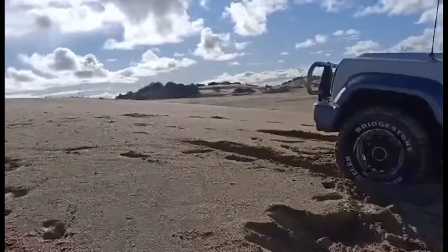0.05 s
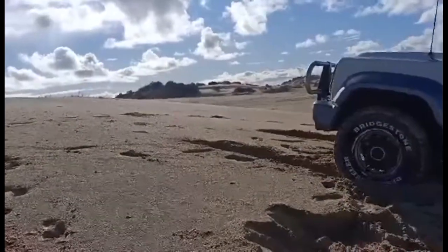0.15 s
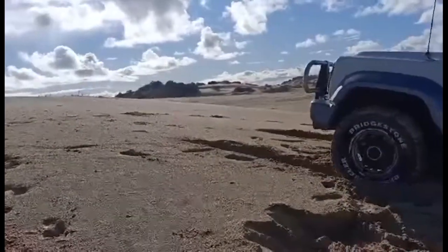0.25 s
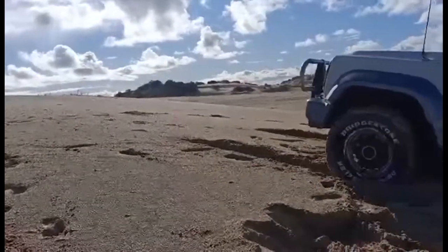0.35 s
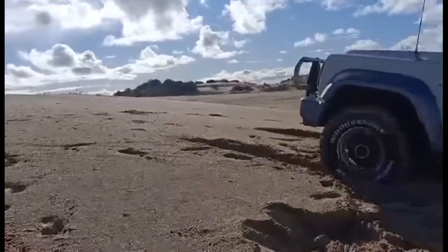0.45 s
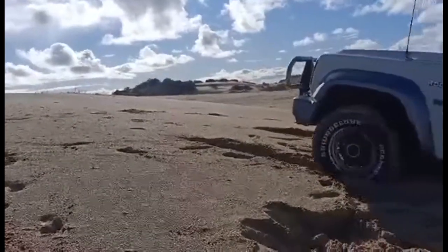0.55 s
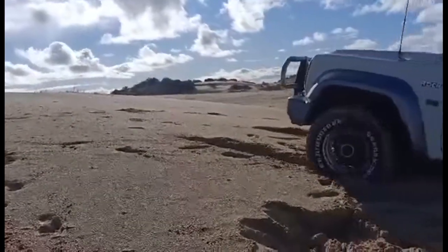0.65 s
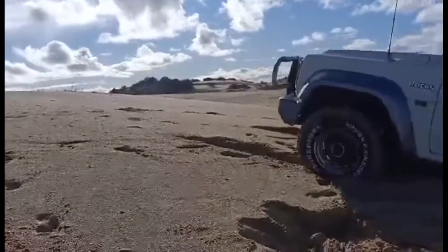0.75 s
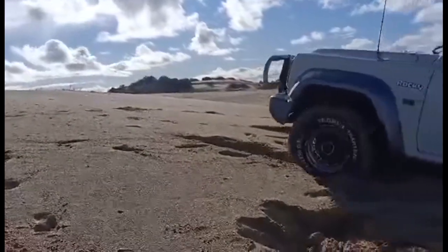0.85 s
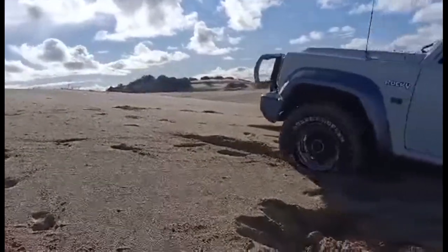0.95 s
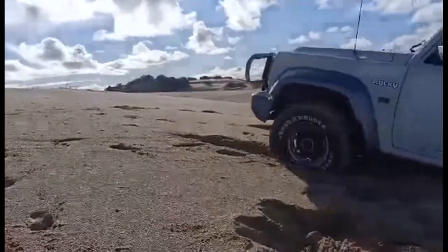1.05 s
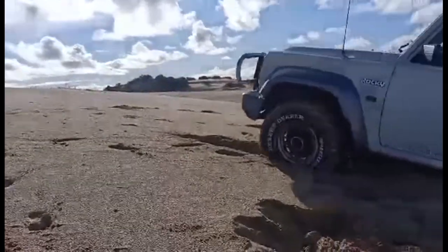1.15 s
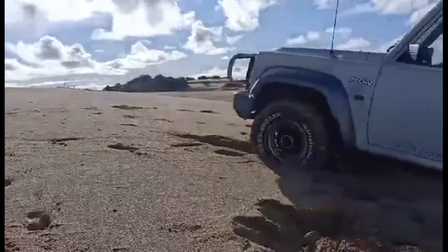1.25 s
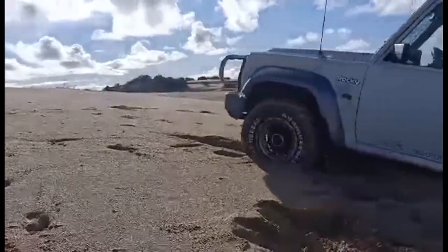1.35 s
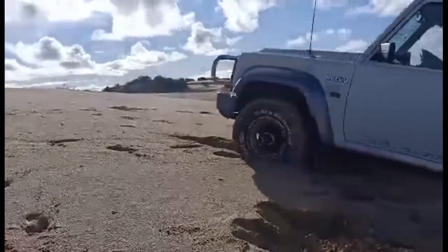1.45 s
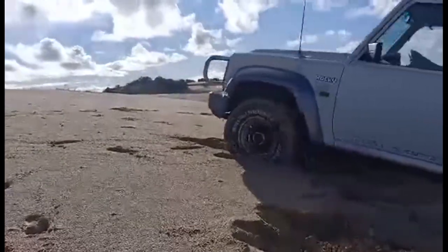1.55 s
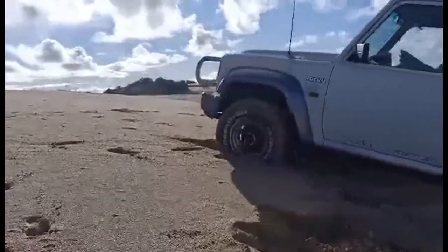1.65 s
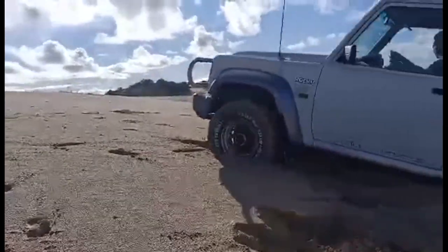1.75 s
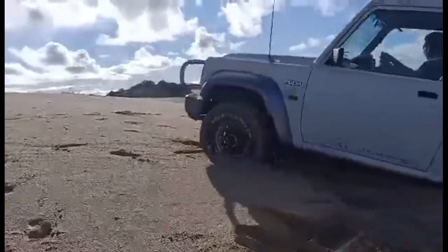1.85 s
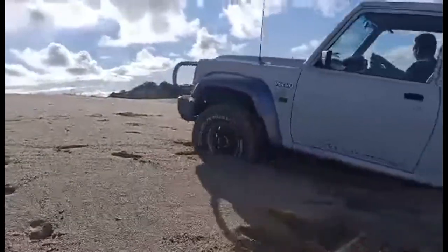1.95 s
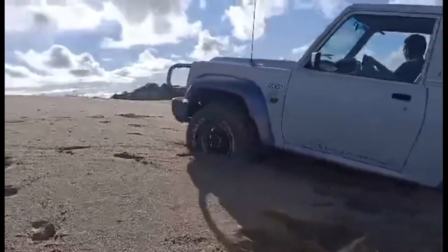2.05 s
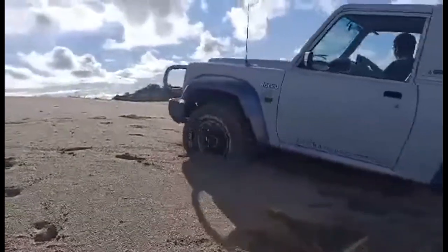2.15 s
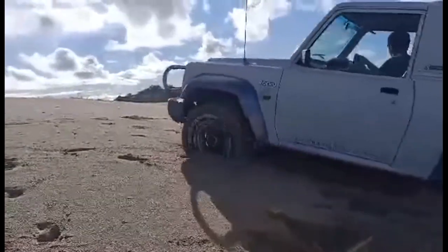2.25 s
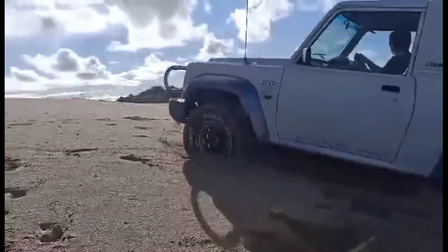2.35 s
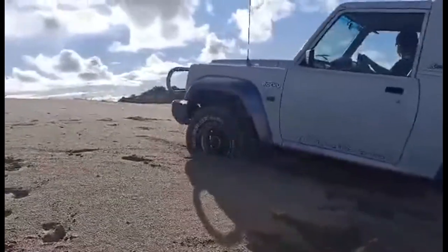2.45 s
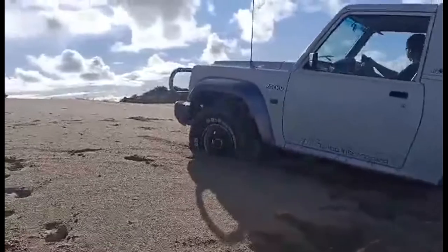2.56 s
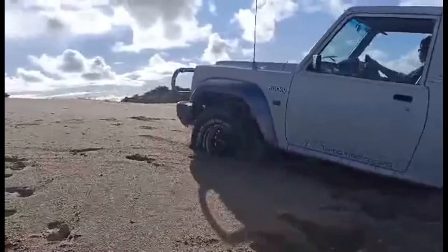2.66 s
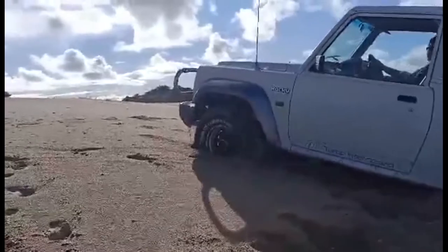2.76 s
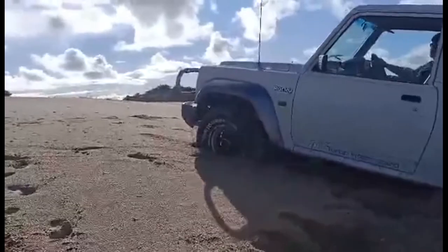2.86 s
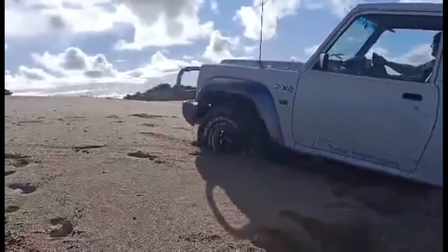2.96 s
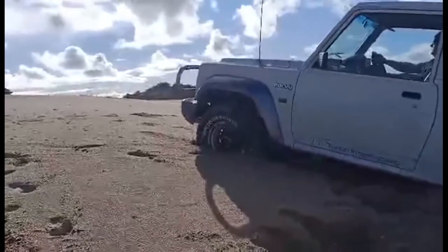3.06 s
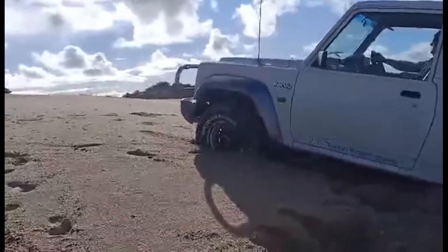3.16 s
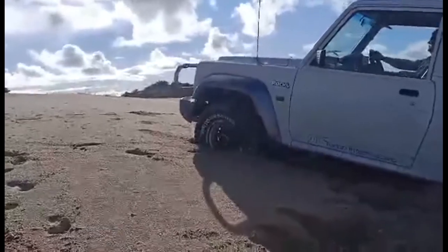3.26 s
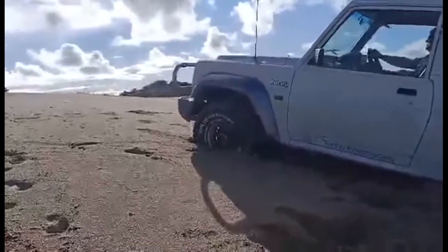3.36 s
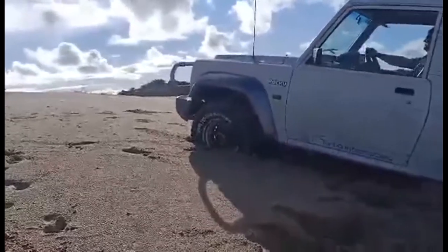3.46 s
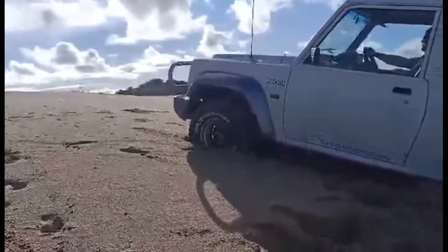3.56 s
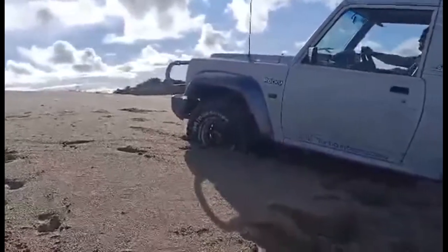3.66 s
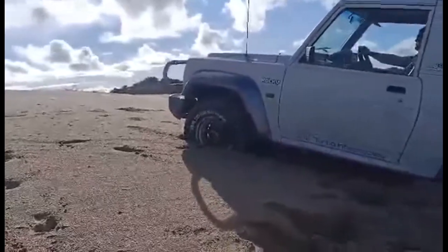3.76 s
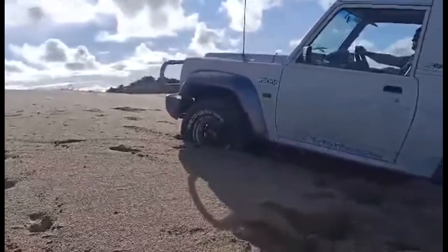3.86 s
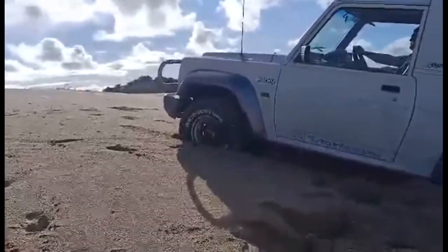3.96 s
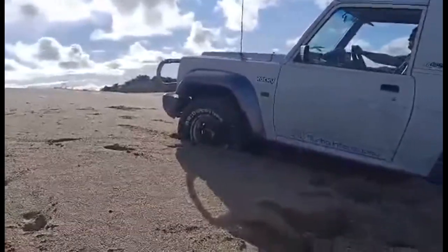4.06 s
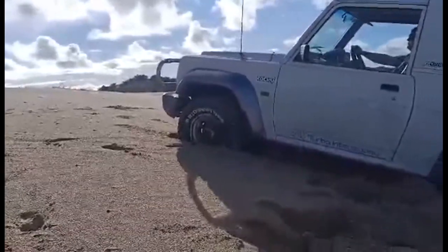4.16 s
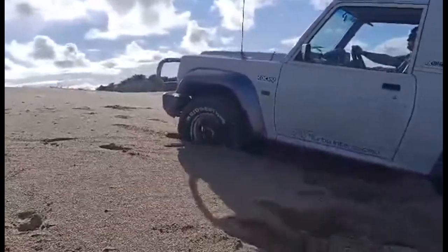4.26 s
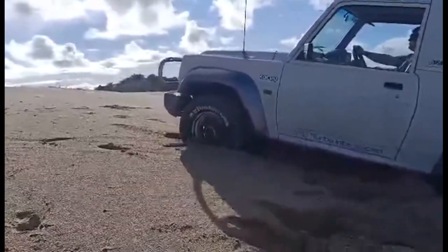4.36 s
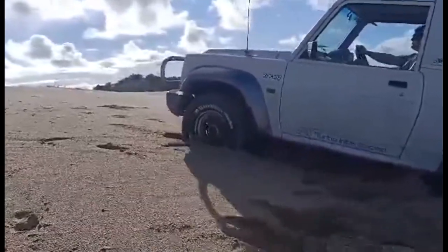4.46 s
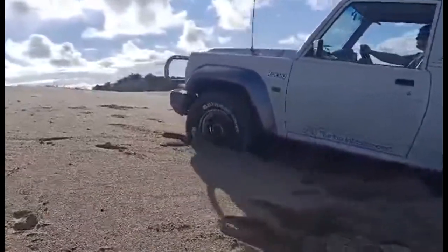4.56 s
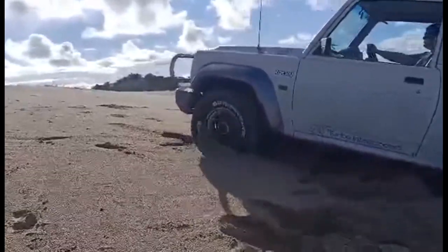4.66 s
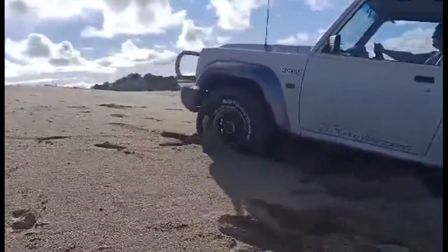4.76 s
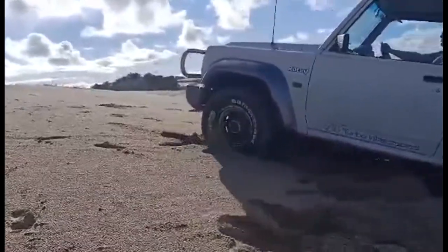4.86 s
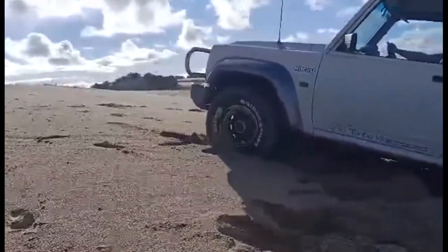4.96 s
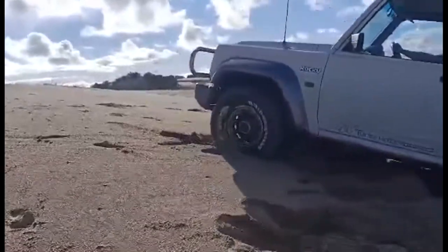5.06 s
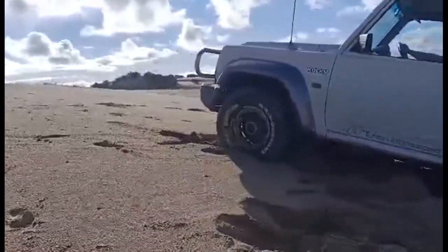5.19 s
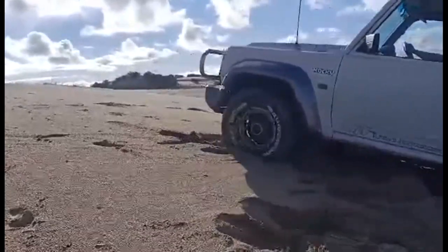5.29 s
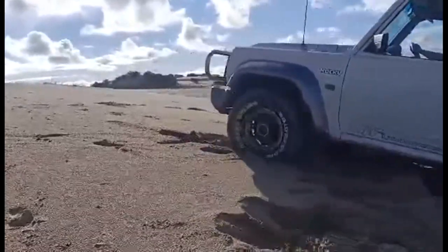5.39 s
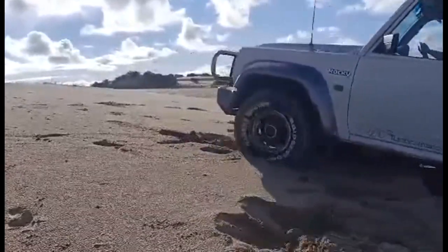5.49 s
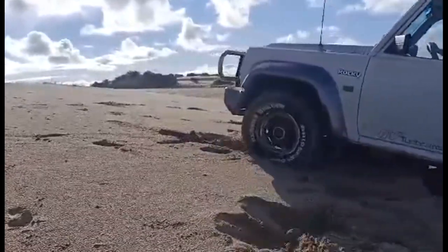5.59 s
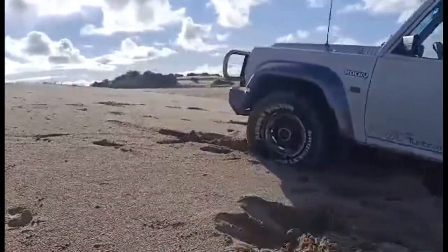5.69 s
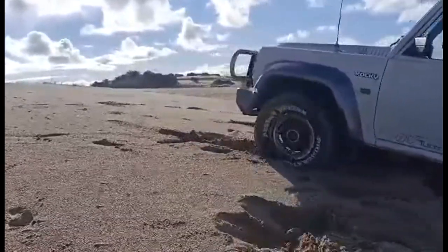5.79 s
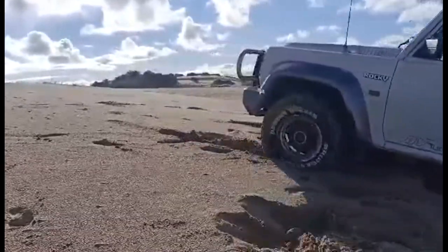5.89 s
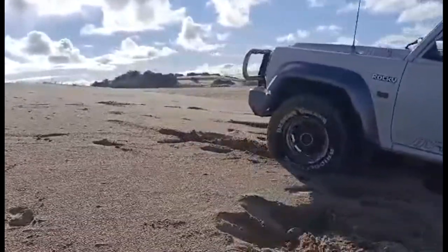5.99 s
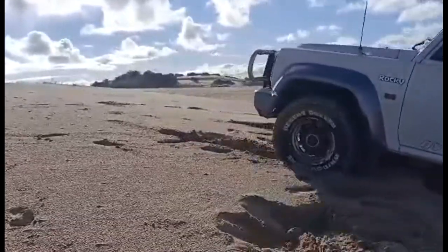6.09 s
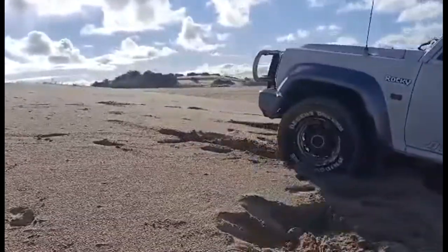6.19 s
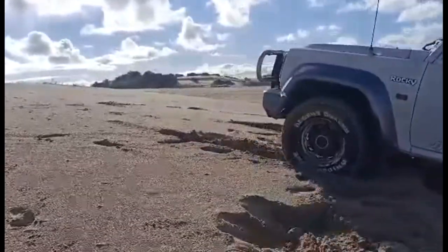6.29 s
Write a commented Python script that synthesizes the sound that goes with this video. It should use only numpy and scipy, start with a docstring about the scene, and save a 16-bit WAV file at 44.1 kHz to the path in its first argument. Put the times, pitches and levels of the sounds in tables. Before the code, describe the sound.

A four-wheel drive's turbo diesel engine labours through soft beach sand, close to the microphone. It revs up with a deep boom, hard knocking and a thin turbo hiss and whistle, while the tyres churn with a dull rumble. The throttle shuts, the body thumps and the revs fall. The engine pulls again gently, then settles to a slow clatter.

```python
"""A four-cylinder turbo diesel engine drives a four-wheel drive through soft beach sand, close by.
It revs up under load with a deep boom and hard knock, the throttle shuts and the body thumps,
then it pulls again gently and drops to a slow clatter. Each firing of a cylinder sends gas down the
exhaust pipe and makes the engine's metal ring. Wheels churn the sand underneath, and the turbo
hisses and whistles, following the gas flow a little late."""
import sys
import numpy as np
from scipy import signal
from scipy.fft import rfft, irfft
from scipy.io import wavfile
from scipy.ndimage import uniform_filter1d

SR = 44100
rng = np.random.default_rng(int(sys.argv[2]) if len(sys.argv) > 2 else 0)


def bounce(signal):
    """Save signal as a 16-bit WAV file at the path given by the first command-line argument."""
    frames = np.transpose(np.atleast_2d(signal))
    limited = np.clip(frames, -1, 1)
    pcm = np.round(limited * 32767).astype(np.int16)
    wavfile.write(sys.argv[1], SR, pcm)


N = 279153
TIME = np.arange(N) / SR


def from_db(db):
    """Turn decibels into a number to multiply by."""
    return 10 ** (np.asarray(db) / 20)


def rms_one(x):
    """Scale a sound to an average power of 1."""
    return x / np.sqrt(np.mean(x ** 2) + 1e-20)


def curve(rows):
    """Join (seconds, value) points with straight lines."""
    return np.interp(TIME, *np.transpose(rows))


def levelled(x, size=8000):
    """Hold the power near 1 over every few firings; the pulses keep their shape."""
    power = uniform_filter1d(uniform_filter1d(x ** 2, size), size // 2)
    return x / np.sqrt(np.maximum(power, 1e-20))


def drift(hz):
    """A smooth random wobble of about 1 either way; more hz makes it quicker."""
    step, warm_up = 40, 2000
    r = np.exp(-2 * np.pi * step * hz / SR)
    slow = signal.lfilter([1], [1, -2 * r, r * r], rng.standard_normal(N // step + warm_up + 2))
    slow = rms_one(slow[warm_up:])
    return np.interp(np.arange(N) / step, np.arange(len(slow)), slow)


def coloured(x, spectrum, size=4096):
    """Give a sound the tone colour drawn by (Hz, dB) points, at a power of 1."""
    hz, db = np.transpose(spectrum)
    octave = np.log2(np.maximum(np.fft.rfftfreq(size, 1 / SR), 1))
    outside = np.abs(octave - np.clip(octave, np.log2(hz[0]), np.log2(hz[-1])))
    gain = from_db(np.interp(octave, np.log2(hz), db) - 30 * np.minimum(outside, 2))
    # build a filter that rings only after a hit, never before
    cepstrum = irfft(np.log(gain))[:size // 2]
    response = irfft(np.exp(rfft(np.r_[cepstrum[0], 2 * cepstrum[1:]], size)))
    return rms_one(signal.oaconvolve(x, response)[:N])


def resonate(x, hz, width_hz):
    """Ring at one pitch; a smaller width rings longer."""
    r = np.exp(-np.pi * width_hz / SR)
    feedback = [1, -2 * r * np.cos(2 * np.pi * hz / SR), r * r]
    return signal.lfilter(np.array([1, 0, -1]) * (1 - r * r) / 2, feedback, x + 1e-18)


MID_REVS = 40   # firings per second
THROTTLE_BEND = 1.65   # the first part of the pedal's travel adds little loudness

def loudness(rate, throttle, db, doubling_db, throttle_db):
    """Start from db at mid revs, throttle shut; grow with each doubling of revs and with throttle."""
    return from_db(db + doubling_db * np.log2(rate / MID_REVS) + throttle_db * throttle ** THROTTLE_BEND)


# Engine speed. Each row: time in seconds, firings per second.
SPEED = [(0.0, 25.66), (0.28, 36.84), (0.47, 37.86), (0.61, 33.38), (0.91, 35.47), (1.42, 44.94),
         (1.56, 44.86), (1.9, 56.77), (2.14, 62.95), (2.36, 62.69), (2.59, 73.81), (2.74, 59.01),
         (2.84, 54.03), (3.64, 26.73), (3.99, 30.44), (4.2, 27.49), (4.66, 28.22), (5.17, 22.13),
         (6.33, 20.82)]
# The driver's foot. Each row: time in seconds, throttle from 0 (shut) to 1 (wide open).
THROTTLE = [(0.08, 0.12), (.28, 0.57), (.52, 0.52), (.7, 0.83), (1.0, 0.79), (1.2, 0.86), (1.6, 0.86),
            (2.28, 0.7), (2.55, 0.87), (2.62, 0.4), (3.1, 0.23), (3.35, 0.11), (3.65, 0.11), (3.9, 0.25),
            (4.35, 0.31), (4.67, 0.45), (4.95, 0.1), (6.33, .01)]

def driving():
    """The engine's speed, its running count of firings and the throttle."""
    rate = curve(SPEED)
    return rate, np.cumsum(rate) / SR, curve(THROTTLE)


def kicked(firings, modes, lead, uneven_db, gas_noise, soft_hz, puff=0.67):
    """Each firing, moved early by lead firings, sets tones ringing with a soft kick and a gas puff."""
    count = np.floor(firings + lead).astype(int)
    starts = np.flatnonzero(np.diff(count)) + 1
    gas = gas_noise * rms_one(rng.standard_normal(N) * np.exp(-((firings + lead) % 1) / puff))
    chance = rng.standard_normal((300, len(modes)))[:len(starts)]
    out = 0
    for k, (hz, width_hz, db, *cylinder_db) in enumerate(modes):
        kick_db = np.array(cylinder_db)[count[starts] % len(cylinder_db)]
        kicks = np.zeros(N)
        kicks[starts] = from_db(kick_db + uneven_db * chance[:, k])
        out = out + (-1) ** k * from_db(db) * resonate(rms_one(kicks) + gas, hz, width_hz)
    band = signal.butter(2, [modes[0][0] * .7, soft_hz], "band", fs=SR, output="sos")
    return levelled(signal.sosfilt(band, out))


# Shudder tones. Each row: pitch in Hz, width in Hz, level in dB, extra dB for each of four cylinders.
SHUDDER_TONES = [(102.2, 27, 1.5, -0.72, -0.096, -0.85, 0.82), (142.8, 9.8, 2.5, 0.12, -1.3, 0.099, 3.4),
                 (180.3, 30, -2, -1.3, -1.6, 0.33, 5.8)]
# How loud the shudder is. Each row: time in seconds, level in dB.
SHUDDER_DB = [(0, -35.5), (.5, -37), (1.2, -34), (2.4, -46), (3.3, -37.5), (4.1, -51), (4.95, -37),
              (5.35, -32.5), (5.7, -38.5)]

def shudder(firings):
    """The firings shake the engine on its mounts."""
    shake = kicked(firings, SHUDDER_TONES, lead=0.2506, uneven_db=3.0, gas_noise=0.21, soft_hz=210)
    return from_db(curve(SHUDDER_DB)) * shake


# Body tones. Each row: pitch in Hz, width in Hz, level in dB, extra dB for each of four cylinders.
DRONE_TONES = [(207.5, 47, -2, 1.9, 0.8, -1.5, -4), (235, 50.7, -1.5, 2.9, 4.05, -2.5, -3)]

def drone(firings, rate, throttle, peak_rate=60.4, half_width=14.9, peak_db=18.86):
    """The body drones most as the revs pass the speed that suits its panels."""
    swell_db = peak_db / (1 + ((rate - peak_rate) / half_width) ** 2)
    panels = kicked(firings, DRONE_TONES, lead=0.3684, uneven_db=1.0, gas_noise=0.17, soft_hz=367)
    return from_db(-49.5 + swell_db + 17 * throttle ** THROTTLE_BEND) * panels


# Growl tones. Each row: pitch in Hz, width in Hz, level in dB, extra dB for each of four cylinders.
GROWL_TONES = [(301.6, 28, 3.5, 1.3, -5.5, 1.3, 0), (331.5, 39, 0, 2.5, -13, 0.79, 0),
               (419, 39, -10, 0.4, -20, -0.77, 0)]
# How loud the growl is. Each row: time in seconds, level in dB.
GROWL_DB = [(0, -41.5), (1.6, -38.5), (2.2, -25), (2.55, -30), (2.75, -34.5), (3.6, -50), (4.1, -41),
            (4.65, -37.5), (5.0, -66), (6.33, -59)]

def growl(firings):
    """Rough puffs of gas make the pipe growl around 330 Hz."""
    pipe = kicked(firings, GROWL_TONES, lead=.33, uneven_db=3.5, gas_noise=0.96, soft_hz=488)
    return from_db(curve(GROWL_DB)) * pipe


# What the pipe lets through. Each row: pitch in Hz, level in dB.
PIPE = [(21, -52), (30, -54), (45, -35), (56, -21), (71, -18.5), (84, -8), (106, -11.5), (128, -13),
        (150, -28), (175, -22.5), (205, -49), (230, -21), (255, -20), (290, -15)]
# The gas pulses. Each entry: strength in dB at 1, 2, 3 and 4 times the firing rate.
HARMONIC_DB = [2, -9.5, -14.5, -12]

def boom(firings, rate, throttle, lead=0.268, travel_s=0.00896, skew=0.4, idle_fuel=0.011):
    """Deep tones of the gas pulses slide through the pipe's own pitches; more fuel makes them louder."""
    arrived = firings + lead - travel_s * rate
    hz, pipe_db = np.transpose(PIPE)
    out = 0
    for k, harmonic_db in enumerate(HARMONIC_DB):
        passed_db = np.interp(np.log((k + 1) * rate), np.log(hz), pipe_db)
        db = harmonic_db + passed_db + 1.26 * drift(18.0)
        out = out + from_db(db) * np.cos(2 * np.pi * (k + 1) * arrived + skew * k * (k - 1))
    fuel = idle_fuel + (1 - idle_fuel) * throttle
    return np.sqrt(2) * fuel ** 0.83 * out


# The four cylinders. Each entry: knock strength in dB.
CYLINDER_DB = [0.33, 0.24, -0.46, 0.29]
# Single firings, most of them harder. Each row: time in seconds, extra dB (scaled by hard_share).
HARD_KNOCKS = [(.70, -1), (.845, 2.5), (.901, 8.5), (1.214, 5.5), (1.49, 7), (1.743, 5), (2.503, 0)]

def bursts(firings, rate, rise_s, uneven_db, sharpness, hard_share):
    """The loudness jumps up and dies away within each firing, each cylinder at its own strength."""
    count = np.floor(firings).astype(int)
    chance_db = uneven_db * rng.standard_normal(300)[count]
    strength_db = np.array(CYLINDER_DB)[count % len(CYLINDER_DB)] + chance_db
    for s, db in HARD_KNOCKS:
        nearest = np.round(np.interp(s, TIME, firings))
        strength_db = strength_db + hard_share * db * (count == nearest)
    peak_s = rise_s * (rate.mean() / rate) ** 0.097   # shorter at higher revs
    age = firings % 1 / rate / peak_s
    return levelled(from_db(strength_db) * (age * np.exp(-age)) ** sharpness)


# Ringing of the engine block and covers. Each row: pitch in Hz, width in Hz, level in dB.
BLOCK_TONES = [(741, 23, 1), (1152, 190, -7), (1386, 460, -3), (2081, 28, 1.5), (2723, 7.7, 5.5),
               (2900, 25, -13), (3750, 23, -10)]
BURST_SHARE, LOADED_SHARE = (0.29, 1), (0.17, 0.61)   # each pair: throttle shut, wide open

def clatter(burst, rate, throttle, loaded, light, grain_db):
    """Gritty metal hits ring in the block: bursts at the firings over steady gear and valve noise."""
    blur = 0.21 * np.log2(rate / MID_REVS)   # bursts run together at high revs
    share = np.clip(np.interp(throttle, [0, 1], BURST_SHARE) - blur, 0, .98)
    envelope = np.sqrt(share * burst ** 2 + 1 - share)
    impacts = levelled(rng.standard_normal(N) * envelope * from_db(grain_db * drift(280)))
    rung = impacts + sum(from_db(db) * resonate(impacts, hz, width) for hz, width, db in BLOCK_TONES)
    load = np.interp(throttle, [0, 1], LOADED_SHARE)
    return levelled(load * coloured(rung, loaded) + (1 - load) * coloured(rung, light))


# Knock colour, working hard and running light. Each row: pitch in Hz, relative level in dB.
KNOCK_LOADED = [(450, -17), (590, -4), (740, 2.5), (900, 2), (1300, -1), (1500, -1), (1720, -28),
                (2100, -26.5)]
KNOCK_LIGHT = [(400, 12.5), (600, 0), (760, 8.5), (1000, 6), (1400, 2.5), (1700, -5.5), (2100, -4.5)]

def knock(firings, rate, throttle):
    """Burning fuel hammers the engine block at each firing."""
    hits = bursts(firings + 0.33, rate, rise_s=0.0037, uneven_db=1.5, sharpness=0.6, hard_share=1.0)
    gain = loudness(rate, throttle, db=-52.5, doubling_db=6.3, throttle_db=20.2)
    return gain * clatter(hits, rate, throttle, KNOCK_LOADED, KNOCK_LIGHT, grain_db=2.5)


# Rattle colour, working hard and running light. Each row: pitch in Hz, relative level in dB.
RATTLE_LOADED = [(1600, -10), (2050, 1), (2600, 6), (3100, 3), (3800, 5.5), (4300, -2.5), (4900, -12.5),
                 (5900, -15.5), (6900, 0.5), (8000, -11.5), (10000, -15), (12000, -19.5), (14000, -21)]
RATTLE_LIGHT = [(1400, 1), (1650, 1), (1900, 7), (2500, -0.5), (3100, -3.5), (3750, 0.5), (4300, -10),
                (5000, -9), (6000, -5), (6900, -2.5), (8300, -3.5), (10000, -10), (14000, -11)]

def rattle(firings, rate, throttle):
    """Bright metal ticking comes just after each knock."""
    ticks = bursts(firings + 0.26, rate, rise_s=0.0055, uneven_db=2.54, sharpness=1.5, hard_share=0.22)
    gain = loudness(rate, throttle, db=-53.5, doubling_db=6.1, throttle_db=13.03)
    return gain * clatter(ticks, rate, throttle, RATTLE_LOADED, RATTLE_LIGHT, grain_db=1.0)


# Colour of churning sand. Each row: pitch in Hz, relative level in dB.
CHURN = [(25, -18.5), (45, -2), (70, -2.5), (120, -7.5), (170, 0), (260, -9.5), (400, -17), (600, -28)]

def sand(rate, throttle, lumps_db=1.35):
    """The tyres dig in with a dull, lumpy rumble."""
    gain = loudness(rate, throttle, db=-32.5, doubling_db=6, throttle_db=2.84)
    return gain * from_db(lumps_db * drift(4.9)) * coloured(rng.standard_normal(N), CHURN)


# Drive line and suspension blows. Each row: start in seconds, level in dB, share of rattle (0 to 1).
THUMPS = [(0.337, -22.5, 0.22), (2.808, -15, 0.08), (4.901, -24.5, 0.27)]
# Ringing of the car's frame. Each row: pitch in Hz, width in Hz, level in dB.
FRAME_TONES = [(211, 24, -20), (279, 44, 5.5), (320, 14, -14), (547, 120, -33), (690, 160, -37)]

def thumps(rattle_s=0.056, soft_hz=900):
    """A cushioned blow rings the frame and briefly shakes loose parts."""
    out = np.zeros(N)
    for start, db, share in THUMPS:
        age = np.maximum(TIME - start, 0)
        ring = sum(from_db(tone_db) * np.exp(-np.pi * width_hz * age) * np.sin(2 * np.pi * hz * age)
                   for hz, width_hz, tone_db in FRAME_TONES)
        noise = coloured(rng.standard_normal(N), [(300, 27), (750, 13), (1200, 4), (4000, -10)])
        shake = noise * np.exp(-age / rattle_s) * (age > 0)
        out += from_db(db) * ((1 - share) * ring + share * shake)
    cushioned = signal.sosfilt(signal.butter(1, soft_hz, fs=SR, output="sos"), out)
    return signal.sosfilt(signal.butter(2, 160, "high", fs=SR, output="sos"), cushioned)


def turbo_boost(rate, throttle, full_rate=50, shut_flow=0.71, lag_s=0.13):
    """Gas spins the turbo up with a lag, from 0 to 1, where a relief valve caps it."""
    flow = rate / full_rate * (shut_flow + (1 - shut_flow) * throttle)
    keep = np.exp(-1 / (lag_s * SR))
    return np.minimum(signal.lfilter([1 - keep], [1, -keep], flow), 1)


# Colour of the turbo's air intake. Each row: pitch in Hz, relative level in dB.
INTAKE = [(5200, -32), (6200, 2), (6800, 8.5), (7400, 6), (8200, -21), (10000, -35), (14000, -5)]

def turbo_hiss(firings, boost, throttle, lead=0.042, gulp_db=7.0, flutter_db=1.8):
    """Air rushes in as the boost builds; under load it throbs hardest once every two firings."""
    crank_angle = np.pi * (firings + lead)
    throb_db = gulp_db * throttle * (np.cos(crank_angle) + np.cos(2 * crank_angle))
    rush_db = -51 - 59 * (1 - boost) - 4 * (1 - throttle)
    gain = from_db(rush_db + throb_db + flutter_db * drift(10.5))
    return gain * coloured(rng.standard_normal(N), INTAKE)


def turbo_whistle(boost, slow_hz=5540, fast_hz=7270, width_hz=160):
    """A thin band of air noise follows the turbo shaft as it winds up and coasts down."""
    angle = 2 * np.pi * np.cumsum(slow_hz + (fast_hz - slow_hz) * boost) / SR
    band = drift(width_hz) * np.cos(angle) + drift(width_hz) * np.sin(angle)
    return from_db(-57.5 - 31 * (1 - boost)) * band


def scene():
    """Add engine, tyres, turbo and thumps into one channel."""
    rate, firings, throttle = driving()
    engine = shudder(firings) + drone(firings, rate, throttle) + growl(firings)
    engine += knock(firings, rate, throttle) + rattle(firings, rate, throttle)
    engine += boom(firings, rate, throttle)
    tyres = sand(rate, throttle)
    boost = turbo_boost(rate, throttle)
    turbo = turbo_hiss(firings, boost, throttle) + turbo_whistle(boost)
    return (engine + tyres + turbo + thumps())[None]


def record(dry, cutoff_hz=14100):
    """Cut away the very highest treble."""
    return signal.sosfilt(signal.ellip(12, .2, 80, cutoff_hz, fs=SR, output="sos"), dry)


dry = scene()
out = record(dry)
bounce(out)
```